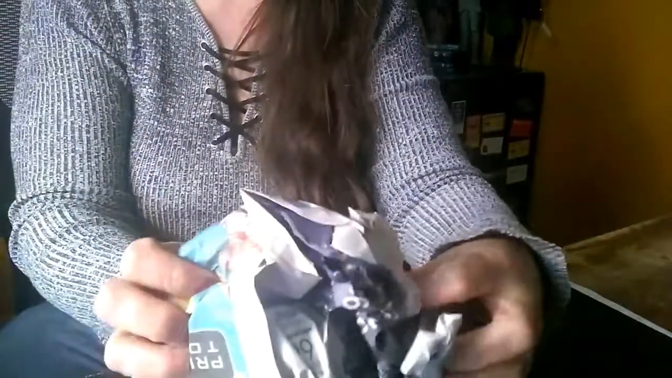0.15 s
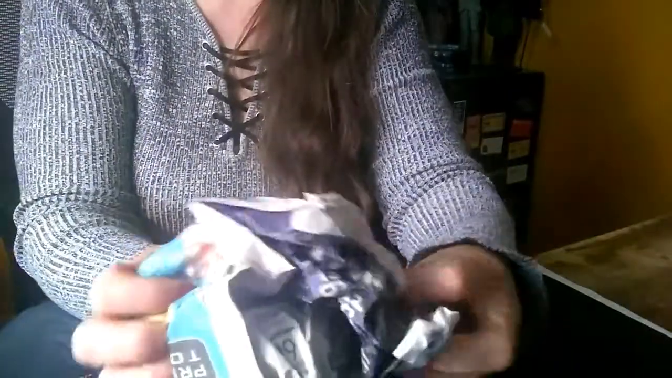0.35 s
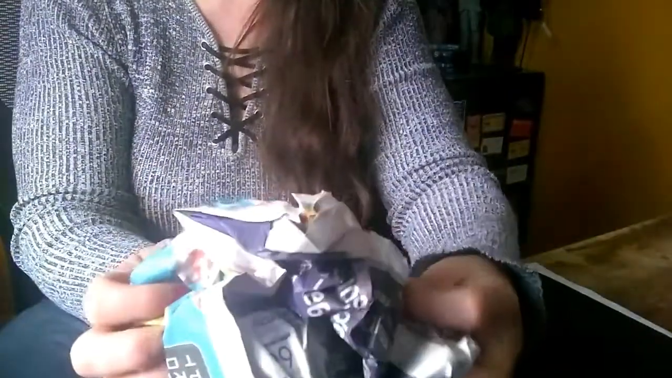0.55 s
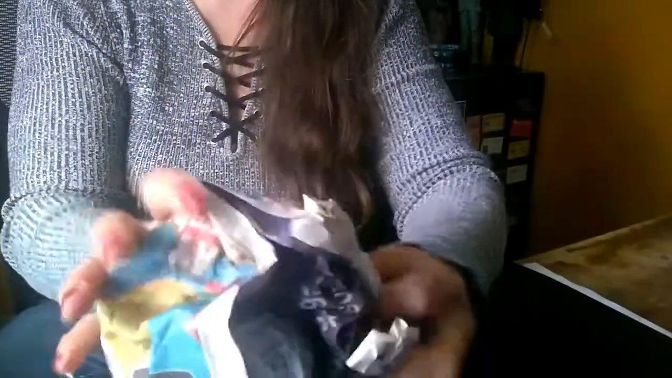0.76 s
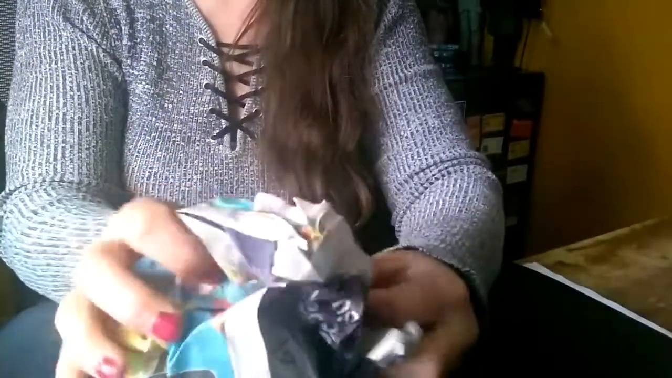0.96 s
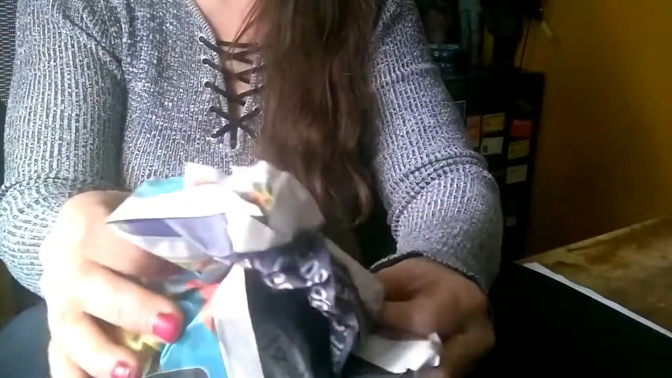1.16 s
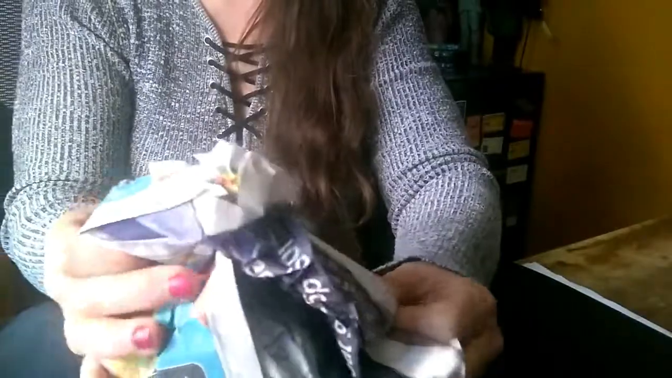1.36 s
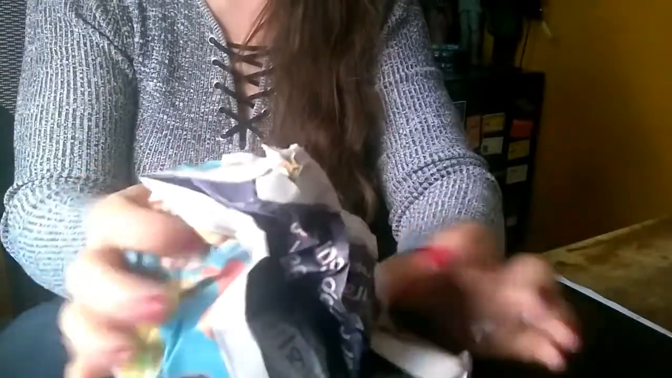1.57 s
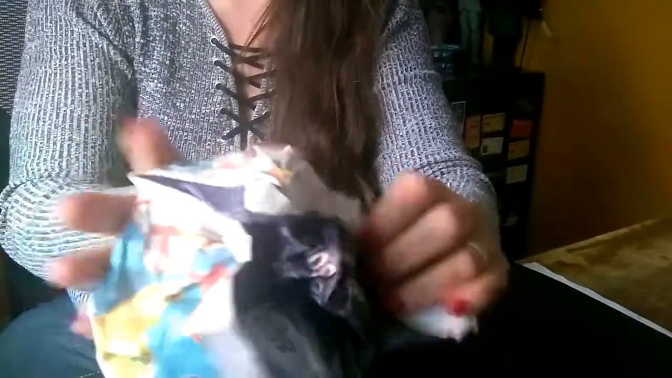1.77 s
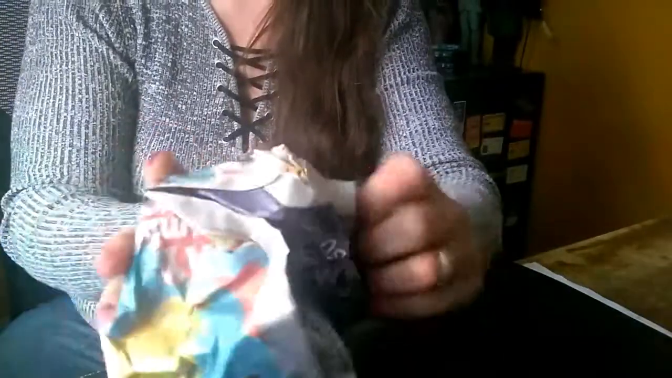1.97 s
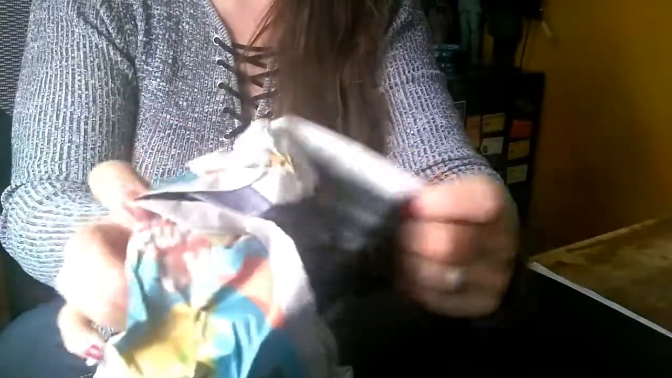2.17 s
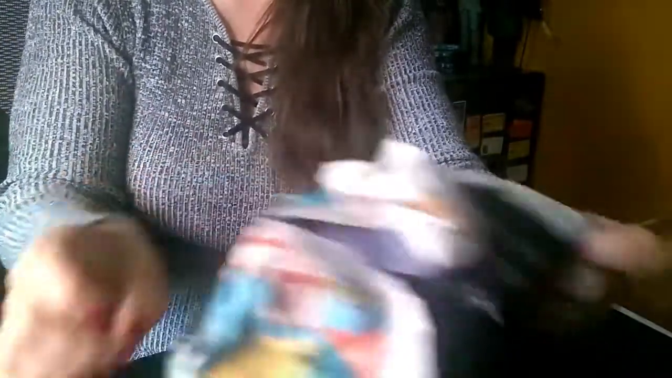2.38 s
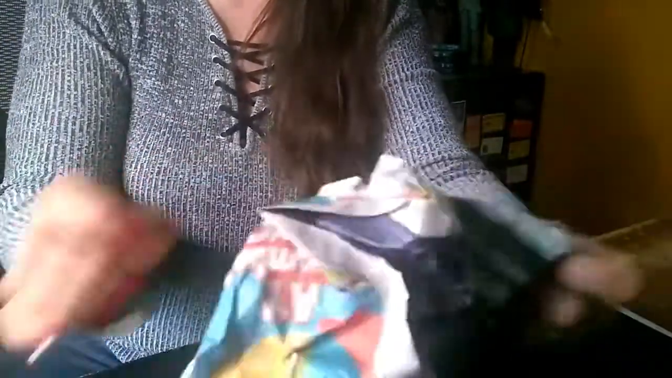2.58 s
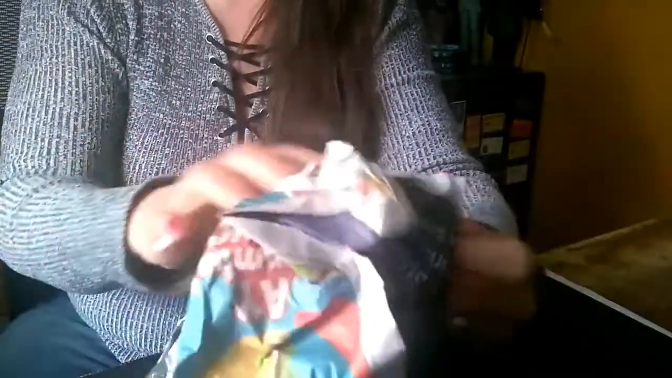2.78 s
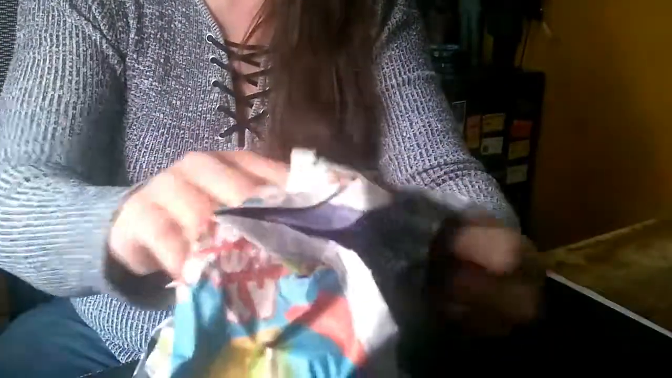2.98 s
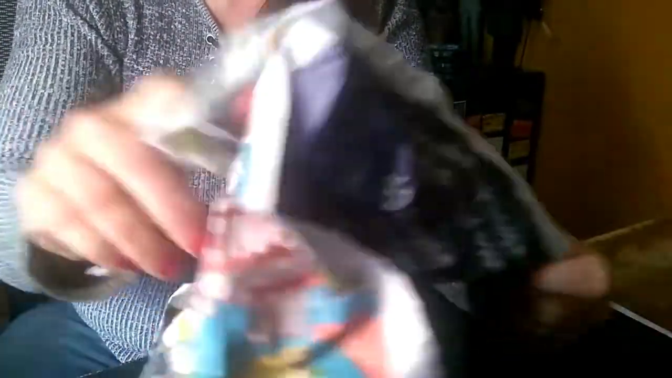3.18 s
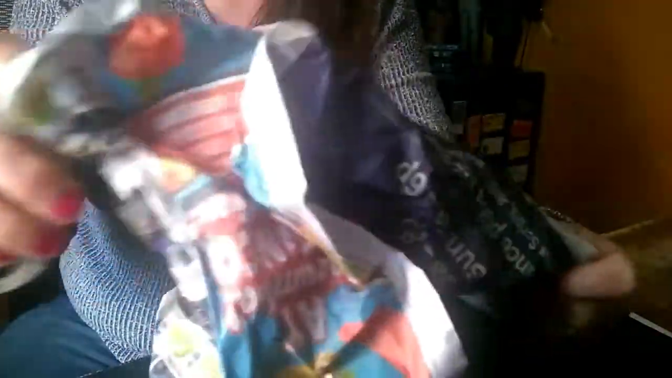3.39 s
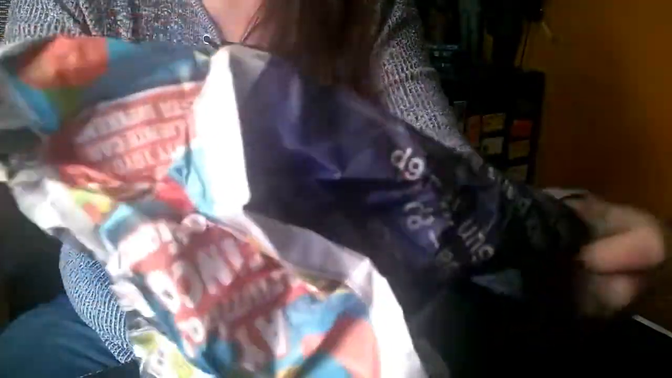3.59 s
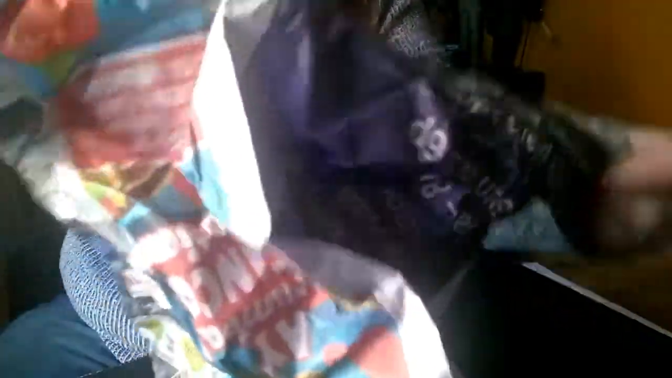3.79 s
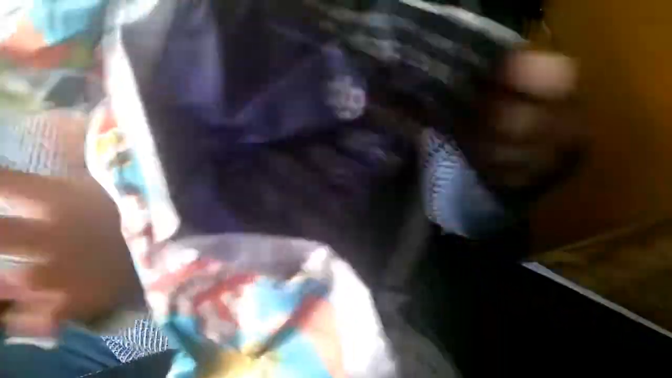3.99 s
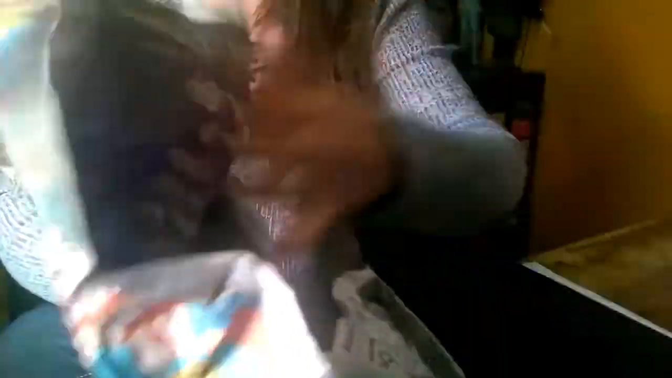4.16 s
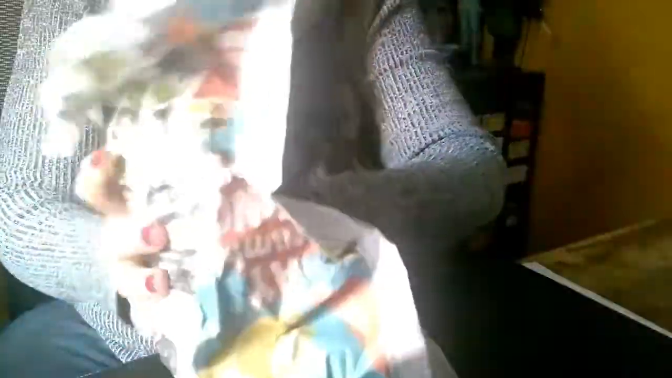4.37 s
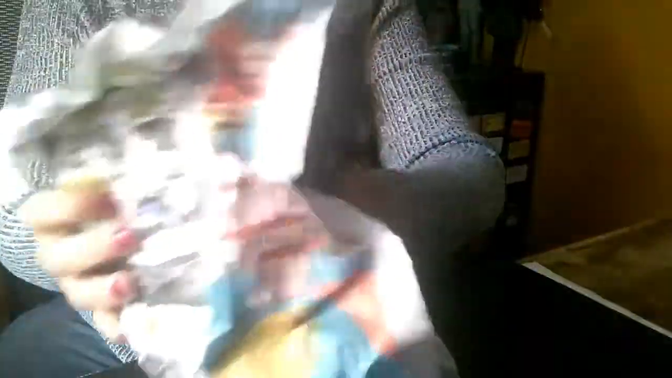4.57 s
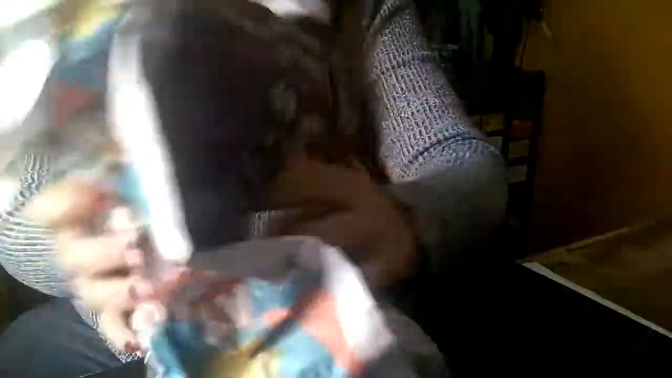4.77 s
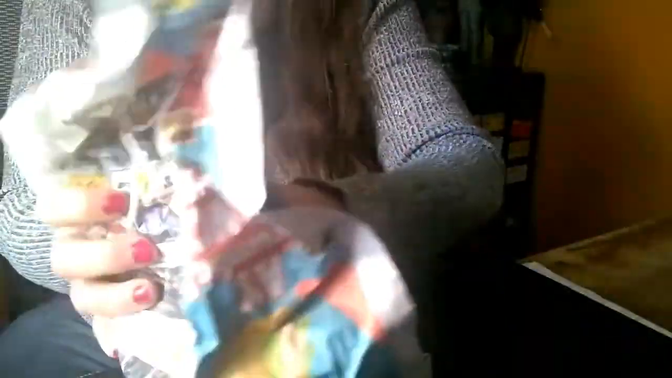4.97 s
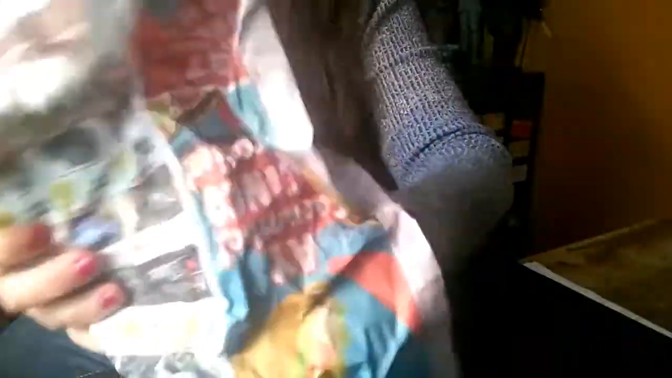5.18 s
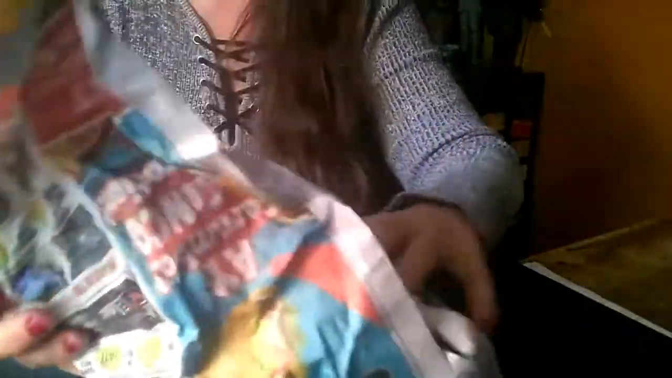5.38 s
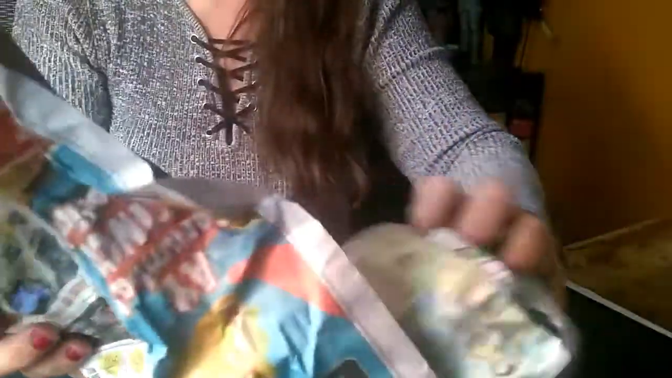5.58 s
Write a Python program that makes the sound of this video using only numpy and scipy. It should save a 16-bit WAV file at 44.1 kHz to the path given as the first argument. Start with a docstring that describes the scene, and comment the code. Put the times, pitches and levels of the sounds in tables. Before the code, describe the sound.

Crumpled newspaper is pulled open close to the microphone, crinkling and snapping in uneven bursts with brief hushes between them.

```python
"""Two hands pull open a ball of crumpled newspaper close to a laptop microphone in a quiet room.
It starts at once: tiny creases and sliding sheets rustle (short jolts and coloured noise), over faint air.
Sharp snaps and duller thumps (jolts that ring paper facets and folds) crowd in up to about 2.4 s.
After a hush a busy burst follows at 3 s, then a near pause at 3.6 s, and a last rush around 5 s that eases.
A short room tail follows the snaps and thumps; a noise gate lowers the pauses and the top is rolled off."""
import sys
import numpy as np
from scipy import signal
from scipy.fft import rfft, irfft
from scipy.io import wavfile
from scipy.ndimage import uniform_filter1d, minimum_filter1d

SR = 44100
rng = np.random.default_rng(int(sys.argv[2]) if len(sys.argv) > 2 else 0)


def wrap_up_sound(samples):
    """Save the sound to the file named by the first command line argument, as 16-bit audio."""
    columns = np.atleast_2d(samples).T
    # keep every value between -1 and 1, then stretch to whole-number steps
    tamed = np.clip(columns, -1, 1)
    steps = np.round(tamed * 32767).astype(np.int16)
    wavfile.write(sys.argv[1], SR, steps)


def convert_level_to_amplitude(level_db):
    """Map a level in decibels to its linear amplitude factor."""
    exponent = np.asarray(level_db, float) / 20
    return 10 ** exponent


N = 248724

# Levels in the tables are settings ahead of the trims, room, table top and microphone.
# creases that snap: (time [s], crack level [dB], facet pitch [Hz], tick level [dB], tick pitch [Hz])
SNAPS = [(0.0034, -24, 2300, -30.5, 4360), (0.0424, -23.5, 2110, -33, 4490), (0.0559, -23, 2060, -25, 4100),
         (0.1901, -15.5, 1880, -22.5, 4530), (0.3087, -24, 3530, -51, 4130),
         (0.379, -15.5, 2600, -20.5, 5600), (0.4205, -18.5, 2540, -45, 5770),
         (0.4381, -27, 2510, -31, 5290), (0.4968, -25.5, 2680, -31.5, 5200), (0.607, -31, 1940, -28, 4660),
         (0.632, -19, 3340, -27.5, 5200), (0.7906, -27, 2080, -43, 6220), (0.8024, -21.5, 2050, -47, 5760),
         (0.8652, -12.5, 2190, -39, 4730), (0.8777, -8, 2770, -27, 5360), (0.8848, -14, 2260, -30, 4290),
         (0.9158, -18, 2270, -31, 4220), (0.9516, -12.5, 1980, -23, 5300), (0.9634, -16.5, 2740, -30, 5000),
         (0.9956, -19, 2310, -27.5, 4240), (1.0416, -29, 2570, -30, 6210), (1.052, -27, 1300, -27, 5630),
         (1.0725, -18.5, 2260, -23, 4180), (1.099, -22, 3550, -24.5, 5900), (1.134, -20.5, 1790, -56, 4310),
         (1.2152, -27, 1900, -36, 6400), (1.2456, -18, 1560, -47, 6980), (1.2585, -16, 2120, -52, 4160),
         (1.281, -17.5, 1890, -32, 5820), (1.315, -11.5, 1570, -42, 4480), (1.4874, -25, 1760, -30, 4550),
         (1.4972, -19, 1960, -18.5, 4270), (1.5076, -23, 3170, -25, 4150), (1.5213, -24, 2100, -20.5, 5030),
         (1.539, -19.5, 2180, -45, 7190), (1.6627, -24.5, 2770, -33, 4590), (1.715, -21, 2720, -37, 5780),
         (1.732, -16, 2480, -29, 4100), (1.854, -29, 2810, -39, 4400), (1.9248, -44, 2650, -24, 5860),
         (1.9626, -40, 3520, -38, 5730), (1.9969, -25, 3630, -19.5, 7100), (2.0088, -17, 2390, -19, 5300),
         (2.039, -22.5, 1930, -26, 6730), (2.0446, -20.5, 1860, -24.5, 5900), (2.1245, -8, 2100, -27, 4240),
         (2.1409, -17, 2560, -18.5, 6800), (2.147, -12, 1640, -40, 5660), (2.1779, -12.5, 1500, -35, 6240),
         (2.194, -18, 3190, -40, 5750), (2.2072, -22, 2020, -27, 4970), (2.2428, -10, 2170, -27, 4870),
         (2.2615, -16, 1760, -24, 4120), (2.2914, -7, 2220, -28, 5090), (2.3141, -18, 2690, -22, 5160),
         (2.33, -18, 2440, -25, 5610), (2.37, -15, 2810, -55, 6170), (2.579, -38, 2530, -46.5, 4300),
         (2.587, -35.5, 3430, -64, 4290), (2.599, -35, 2860, -50, 4180), (2.6817, -41.5, 1300, -41.5, 4190),
         (2.7483, -32, 2230, -36, 4220), (2.8086, -26.5, 2310, -49, 4160), (2.9644, -30, 3640, -20.5, 6250),
         (2.982, -21, 3560, -28, 4230), (3.0008, -19, 2480, -24.5, 4790), (3.024, -21.5, 2220, -31, 4300),
         (3.0384, -10.5, 2060, -38, 6060), (3.059, -15, 2120, -46, 4430), (3.0996, -7.5, 2020, -43, 4870),
         (3.121, -20, 1460, -22, 4480), (3.1529, -24, 1590, -20, 6000), (3.236, -19, 1300, -22.5, 5300),
         (3.251, -16.5, 2560, -15.5, 4930), (3.2809, -15.5, 1660, -33, 6290),
         (3.2874, -23, 1960, -29, 4200), (3.3204, -11.5, 1790, -35, 4100), (3.3514, -23, 3150, -54, 5330),
         (3.3657, -23, 1650, -38, 5200), (3.3864, -23, 2530, -32, 4720), (3.4008, -16.5, 1660, -32, 4640),
         (3.408, -21.5, 1720, -28.5, 6590), (3.4217, -20, 2010, -31, 4590), (3.4405, -15, 1550, -34, 7210),
         (3.4583, -6.5, 2100, -14.5, 5100), (3.4778, -15.5, 1630, -19, 5050),
         (3.5162, -21, 1970, -19.5, 5340), (3.5513, -17, 2640, -18.5, 4700), (3.56, -42, 3210, -23.5, 5760),
         (3.6736, -36, 1460, -70, 4160), (3.706, -29.5, 1310, -62, 4100), (3.7743, -34, 1880, -38, 4470),
         (3.8179, -28, 1390, -49, 4750), (3.8594, -32, 1700, -31, 7410), (4.0467, -25.5, 1790, -35, 4760),
         (4.123, -17.5, 2800, -49, 5010), (4.135, -22, 1790, -45, 5270), (4.1589, -17, 2660, -29, 5030),
         (4.1792, -14.5, 1690, -18, 5500), (4.2004, -36, 2000, -32, 5330), (4.2637, -21, 1590, -36, 4670),
         (4.2752, -19, 1870, -16.5, 5700), (4.283, -12, 1710, -21.5, 4760), (4.371, -25, 1420, -32.5, 4460),
         (4.3915, -21, 1920, -47, 5780), (4.4044, -26, 2300, -40, 5880), (4.4333, -26, 1740, -33, 7020),
         (4.4793, -17.5, 2860, -30, 6340), (4.538, -30, 1420, -42, 5360), (4.584, -23, 1250, -54, 5850),
         (4.6033, -17, 1310, -55, 4220), (4.6643, -17, 1450, -32, 4520), (4.7194, -18.5, 1230, -45, 5590),
         (4.7295, -18, 1860, -46, 4530), (4.8382, -18.5, 1700, -33, 5610), (4.8601, -17, 2100, -15, 7300),
         (4.8964, -10.5, 3130, -21, 6940), (4.914, -19, 1680, -24, 5500), (4.9234, -21, 1400, -24, 5770),
         (4.9724, -21, 3230, -32, 4410), (4.996, -13.5, 1810, -41, 4500), (5.0015, -22, 3070, -16.5, 5700),
         (5.0144, -20, 2460, -20.5, 6620), (5.021, -11.5, 2530, -38, 5250), (5.043, -19, 2330, -30, 5250),
         (5.069, -18, 1540, -30, 5760), (5.0975, -11, 1460, -46, 5850), (5.1146, -19, 2860, -26, 5820),
         (5.1502, -20, 1730, -29, 5620), (5.1593, -15.5, 1670, -15.5, 6030), (5.1954, -22, 1720, -40, 4330),
         (5.2246, -23, 2620, -37, 5710), (5.232, -19.5, 1600, -32, 6000), (5.3104, -25, 1420, -26.5, 4500),
         (5.434, -18.5, 1710, -32, 6040), (5.518, -20, 1710, -51, 4950)]
# larger folds that give way: (time [s], thump level [dB], fold pitch [Hz], ring width [share of pitch])
THUMPS = [(0.011, -37, 730, 0.34), (0.047, -27, 525, 0.19), (0.067, -27, 593, 0.25),
          (0.187, -34, 860, 0.25), (0.31, -35, 670, 0.25), (0.345, -32, 543, 0.25), (0.375, -18, 563, 0.27),
          (0.411, -24, 655, 0.38), (0.436, -28, 465, 0.25), (0.494, -32, 790, 0.16),
          (0.593, -33, 533, 0.32), (0.631, -24, 480, 0.23), (0.656, -25, 570, 0.21),
          (0.818, -33.5, 332, 0.27), (0.882, -26.5, 638, 0.29), (0.909, -18.5, 644, 0.18),
          (0.95, -19.5, 570, 0.23), (0.993, -22, 734, 0.22), (1.05, -28, 890, 0.25),
          (1.112, -28, 620, 0.27), (1.214, -18.5, 760, 0.37), (1.313, -19, 575, 0.3),
          (1.415, -26.5, 654, 0.25), (1.498, -30, 467, 0.25), (1.537, -26.5, 776, 0.17),
          (1.652, -30.5, 625, 0.23), (2.043, -27, 590, 0.22), (2.063, -30, 614, 0.23),
          (2.126, -16, 550, 0.29), (2.159, -21, 510, 0.28), (2.243, -13, 563, 0.29),
          (2.328, -18.5, 570, 0.29), (2.573, -48, 536, 0.32), (2.596, -39.5, 550, 0.19),
          (2.681, -47.5, 356, 0.25), (2.963, -39, 568, 0.19), (3.07, -22.5, 544, 0.21),
          (3.098, -18.5, 810, 0.38), (3.25, -19, 600, 0.7), (3.401, -26.5, 370, 0.22),
          (3.46, -19, 365, 0.32), (3.522, -25, 820, 0.25), (3.643, -44.5, 200, 0.23),
          (3.668, -35.5, 580, 0.12), (3.701, -41, 603, 0.19), (3.753, -41.5, 610, 0.25),
          (3.813, -30.5, 299, 0.17), (3.968, -34, 266, 0.19), (4.178, -23, 820, 0.093),
          (4.263, -26, 338, 0.14), (4.532, -29.5, 570, 0.25), (4.549, -27, 820, 0.17),
          (4.602, -29.5, 740, 0.25), (4.666, -25, 350, 0.28), (4.717, -27.5, 565, 0.31),
          (4.782, -40, 608, 0.25), (4.836, -31, 334, 0.19), (4.889, -20.5, 646, 0.21),
          (5.013, -21, 600, 0.23), (5.067, -30, 557, 0.22), (5.195, -23, 825, 0.35),
          (5.229, -26, 870, 0.23), (5.335, -30, 902, 0.18), (5.441, -28, 870, 0.22),
          (5.517, -20, 547, 0.083), (0.946, -22, 340, 0.48), (1.312, -24, 342, 0.6), (1.5, -34, 420, 0.4),
          (2.279, -18, 300, 0.37), (2.327, -24, 331, 0.49), (3.156, -29, 331, 0.4), (4.149, -29, 343, 0.35),
          (4.491, -31, 343, 0.31), (5.114, -26, 266, 0.46), (5.52, -31.5, 313, 0.47)]
# how hard the hands work the paper: (time [s], rustle level [dB])
HANDLING = [(0, -33), (.06, -34), (.17, -43), (.21, -32.5), (.36, -41.5), (.43, -34), (.525, -56.5),
            (.545, -57), (.58, -54), (.624, -37), (.785, -40.5), (.85, -39.5), (.95, -32), (1.05, -37.5),
            (1.126, -37), (1.19, -47.5), (1.28, -35), (1.44, -49), (1.5, -33.5), (1.63, -45.5), (1.74, -42),
            (1.79, -50.5), (1.84, -40), (2.0, -39), (2.09, -37), (2.16, -31.5), (2.33, -30), (2.435, -54.5),
            (2.455, -58), (2.56, -66.5), (2.59, -54.5), (2.62, -56), (2.725, -57), (2.757, -38.5),
            (2.8, -54.5), (2.874, -39.5), (2.944, -46.5), (3.1, -27.5), (3.38, -38), (3.5, -29.5),
            (3.6, -51.5), (3.63, -61), (3.69, -66), (3.712, -45), (3.734, -57.5), (3.815, -39), (3.87, -53),
            (3.9, -65.5), (3.96, -57), (3.99, -49.5), (4.005, -63.5), (4.055, -35.5), (4.12, -40),
            (4.17, -31.5), (4.24, -40), (4.31, -37), (4.57, -41.5), (4.72, -35.5), (4.76, -53),
            (4.81, -47.5), (4.85, -30), (4.9, -26.5), (4.97, -33), (5.17, -35.5), (5.28, -39.5),
            (5.44, -37.5), (5.5, -40), (5.53, -34.5), (5.64, -38.5)]
# colour of the rustle: (time [s], facet pitch [Hz], body [dB], treble [dB], flapping air [dB]),
# the last three relative to the handling level
COLOUR = [(0, 2100, -3, -1.5, -18), (0.199, 2000, -16, -6.5, -33), (.43, 2000, -1, -4, -6),
          (.7, 2150, -6, 1.5, -34), (1.2, 2000, -5, -4, -32), (1.6, 2300, -5, 2.5, -28),
          (1.85, 2600, -6, 4, -22), (2.1, 2200, -5, 3, -44), (2.35, 2100, -0.5, -21, -17.5),
          (2.699, 2400, -3.5, 0, -18), (2.93, 2500, -11.5, 2, -24), (3.05, 2100, -7, -1, -22),
          (3.3, 1800, -1.5, 1.5, -12), (3.57, 2110, -10, -1, -3.5), (3.66, 1420, -11, -18, 9),
          (3.72, 1450, -8, -4.5, -1.5), (3.85, 1600, 2, 2.5, -14), (3.97, 2200, -8, 2.5, -2.5),
          (4.06, 2060, -10, -1, -10), (4.26, 1900, -5, 1, -4), (4.34, 1900, -8, 0.5, -20),
          (4.5, 2100, -9, 4.5, -18), (4.7, 1650, -5, -4, -0.5), (5, 2150, -4, 2.5, -11.5),
          (5.2, 1930, -5.5, 0.5, -9.5), (5.46, 1500, -10.5, -4, -11.5), (5.53, 1440, 0, -5.5, -25),
          (5.64, 1330, 4.5, -15, -30)]
# level of the highest sounds relative to the treble: (time [s], level [dB])
TOP_LEVEL = [(0, -2), (.6, 1), (1.0, 3), (1.1, 7), (1.3, -1), (1.5, 3), (1.8, 0.5), (2.5, 1), (3.2, 0),
             (4, -1), (4.9, 1), (5.64, 4)]
# parts of a crease sound: (slip time [s], ring width [share of pitch], broad share [ratio],
# band low [Hz], band high [Hz], trim [dB]); the spark is the highest part of a snap
CRACK = (-0.56, 0.56, 0.34, 1000.5, 3261.5, -6.5)
THUMP = (0.04, 0.8, 0.18, 168, 1161.5, -4)
TICK = (.0004, 0.88, 0.94, 1900, 8400, 0.89)
SPARK = (.0002, 0.7, 0, 9000, 15999, -7)
# rustle resonances, in rows for body, treble, flapping air and sheen:
# (centre [Hz], ring width [share of pitch], band low [Hz], band high [Hz])
RUSTLE_BANDS = [(560., 1.3, 590, 1400), (5470, 0.49, 4500, 6200), (202, 0.96, 40, 390),
                (12500., 2.1, 8100, 14000)]
# low resonances of table top and microphone housing: (centre [Hz], width [Hz], level [dB])
TABLE_RINGS = [(243.4, 34, -5), (330.7, 38, -2.5), (596, 55, -3.5), (809, 19, -4)]
# tone of the microphone chain: (frequency [Hz], gain [dB])
MIC_TONE = [(30, -14), (100, -5.5), (250, -3.5), (500, -2), (6000, -2.5), (7500, -3.5), (8500, -10.5),
            (9250, -29.5), (10000, -29), (15200, -29.5), (15700, -55), (17000, -81.5)]
# narrow dips in the microphone chain: (centre [Hz], width [Hz], depth [dB])
MIC_DIPS = [(3984, 56, -18.5), (7940, 80, -9.5)]

# facets that ring in the middle of the rustle
FACETS_HZ, FACET_WIDTH = [1020, 1440, 1900., 2500., 3600], 0.45
# crowd of small creases after a large one: level against it, then rise and decay times
CROWD_MIDDLE_DB, CROWD_BODY_DB, CROWD_TREBLE_DB, CROWD_FLAP_DB = -19, -17, -13, -24.5
BUILD_S, SETTLE_S = .001, 0.013
# handling above the usual level makes crowds louder and slips longer (dB per dB)
USUAL_DB, CROWD_GRIP, SLIP_GRIP = -38, .4, .6
SLIP_S, SLIP_SPREAD = .0004, .3  # spread in log time
LATE_S, FOLD_LATE_S = 0.000989, 0.002995  # from the first give to the slip
# a fold's slip time in turns of its pitch, its reach as a ratio of pitch, steady push over rough push
FOLD_TURNS, FOLD_REACH, FOLD_PUSH = 0.65, 2.8, 0.2
SHEEN_DB, SHEEN_SWELL = -7, 0.73
AIR_DB = -74
GATE_OPEN_DB, GATE_DEPTH_DB, GATE_KNEE_DB, GATE_HOLD_S = -52, -14, .8, .008
HISS_DB, HISS_KNEE_HZ = -92, 400.
SPAN = 1024  # samples in one crease sound
SPAN_HZ = np.fft.rfftfreq(SPAN, 1 / SR)[1:]
FULL_HZ = np.fft.rfftfreq(N, 1 / SR) + 1  # shifted by 1 Hz to avoid dividing by zero


def unit(x):
    """Scales a sound to an rms (average strength) of 1."""
    return x / np.sqrt(np.mean(x ** 2))


def at(time_s, curve):
    """Reads a (time, level) curve at the given times."""
    return np.interp(time_s, *np.transpose(curve))


def ring(hz, centre_hz, width):
    """Response of a damped resonance, with gain 1 at its centre."""
    return 1 / (1 + 1j * (hz / centre_hz - centre_hz / hz) / width)


def band(hz, low_hz, high_hz):
    """Passes a range of pitches, with two poles at each edge."""
    return 1 / ((1 + low_hz / (1j * hz)) * (1 + 1j * hz / high_hz)) ** 2


def walk(rate):
    """Random levels, `rate` new ones a second, joined by slopes; spread 1."""
    hold = int(SR / rate)
    steps = np.repeat(rng.standard_normal(N // hold + 1), hold)
    return unit(uniform_filter1d(steps, hold)[:N])


def hiss(response, waver_db):
    """Noise of a given colour whose level wavers."""
    noise = irfft(rfft(rng.standard_normal(N)) * response(FULL_HZ), N)
    return unit(noise * convert_level_to_amplitude(waver_db))


def bursts(time_s, db, pitch_hz, part, roughness, order=2):
    """Each slipping crease is a rough jolt that rings a facet, plus a broad share of the band."""
    slip_s, width, broad, low_hz, high_hz, trim_db = part
    # a negative slip time makes a growing jolt that starts after its listed time
    t = np.arange(SPAN) / SR / np.reshape(slip_s, (-1, 1))
    jolt = rfft(roughness * t * np.exp(-t), axis=1)
    facet = ring(SPAN_HZ, pitch_hz[:, None], width) ** order + broad
    jolt[:, 1:] *= facet * band(SPAN_HZ, low_hz, high_hz)
    jolt[:, 0] = 0
    wave = irfft(jolt, axis=1)
    # the level sets the energy, as an rms over 3 ms
    gain = convert_level_to_amplitude(db + trim_db) * np.sqrt(.003 * SR / np.sum(wave ** 2, axis=1))
    wave *= gain[:, None]
    start = np.clip((time_s - slip_s) * SR, 0, N).astype(int)
    out = np.zeros(N + SPAN)
    np.add.at(out, start[:, None] + np.arange(SPAN), wave)
    return out[:N]


def effort(time_s):
    """Handling level above the usual, in dB."""
    return at(time_s, HANDLING) - USUAL_DB


def crowded(base_db, time_s, db):
    """Raises a level by the crowd of small creases around each large one, dying away after it."""
    power = np.zeros(N)
    place = np.clip(time_s * SR, 0, N - 1).astype(int)
    np.add.at(power, place, convert_level_to_amplitude(2 * (db + CROWD_GRIP * effort(time_s))))
    t = np.arange(-8192, 8193) / SR
    swell = np.exp(np.minimum(t / BUILD_S, -t / SETTLE_S))
    power = signal.fftconvolve(power, swell, "same")
    return 10 * np.log10(convert_level_to_amplitude(2 * base_db) + np.abs(power))


def rustle(count=3400, scatter_db=3.0, most_db=9.0, flutter_db=3.0):
    """Tiny creases at chance moments and the hiss of sliding sheets, both following the handling."""
    t = np.arange(N) / SR
    level_db = at(t, HANDLING)
    colour_s, *columns = np.transpose(COLOUR)
    facet_hz, body_db, treble_db, flap_db = (np.interp(t, colour_s, column) for column in columns)

    snap_s, crack_db, _, tick_db, _ = np.transpose(SNAPS)
    thump_s, thump_db, _, _ = np.transpose(THUMPS)
    snap_s, thump_s = snap_s + LATE_S, thump_s + FOLD_LATE_S
    middle_db = crowded(level_db, snap_s, crack_db + CROWD_MIDDLE_DB)
    body_db = crowded(level_db + body_db, thump_s, thump_db + CROWD_BODY_DB)
    flap_db = crowded(level_db + flap_db, thump_s, thump_db + CROWD_FLAP_DB)
    treble_db = crowded(level_db + treble_db, snap_s, tick_db + CROWD_TREBLE_DB)

    when = rng.uniform(0, N / SR, count)
    size_db = scatter_db * rng.exponential(1, count)
    crinkle_db, slide_db, focus = -1.8, -5.5, .42
    flutter = walk(60)

    def creases(centre_hz, part):
        """Small jolts from shared chance times and sizes, each varied in slip time, pitch and level."""
        slip_s = part[0] * np.exp(.4 * rng.standard_normal(count))
        pitch_hz = centre_hz * np.exp(0.33 * rng.standard_normal(count))
        db = np.minimum(size_db + 2.23 * rng.standard_normal(count), most_db)
        roughness = rng.standard_normal((count, SPAN))
        return convert_level_to_amplitude(crinkle_db) * unit(bursts(when, db, pitch_hz, (slip_s, *part[1:]), roughness))

    def sliding(response):
        """Hiss with a shared flutter and a waver of its own."""
        return hiss(response, flutter_db * (flutter + walk(45)))

    body, treble, flap, sheen = (
        convert_level_to_amplitude(slide_db) * sliding(lambda hz: (ring(hz, centre_hz, width) + 0.079) * band(hz, *edges))
        for centre_hz, width, *edges in RUSTLE_BANDS)
    # facets near the size being worked ring most
    facets = [sliding(lambda hz: ring(hz, f, FACET_WIDTH) ** 2) for f in FACETS_HZ]
    shares = np.abs([ring(f, facet_hz, focus) for f in FACETS_HZ])
    middle = np.sum(shares * facets, axis=0) / np.sqrt(np.sum(shares ** 2, axis=0))
    middle *= convert_level_to_amplitude(slide_db)

    middle += creases(facet_hz[(when * SR).astype(int)], CRACK)
    body += creases(RUSTLE_BANDS[0][0], THUMP)
    treble += creases(RUSTLE_BANDS[1][0], TICK)
    # the highest hiss, above about 8 kHz, swells less than the treble
    sheen *= convert_level_to_amplitude(SHEEN_DB + SHEEN_SWELL * treble_db + at(t, TOP_LEVEL))
    out = sheen + convert_level_to_amplitude(middle_db) * middle + convert_level_to_amplitude(flap_db) * flap
    return out + convert_level_to_amplitude(body_db) * body + convert_level_to_amplitude(treble_db) * treble


def room_air():
    """The steady air of the room: soft noise of even level."""
    return convert_level_to_amplitude(AIR_DB) * hiss(lambda hz: band(hz, 150., 5000.), 0)


def snaps():
    """Each crease that stands out is heard as a crack, a higher tick and a still higher spark."""
    time_s, crack_db, facet_hz, tick_db, tick_hz = np.transpose(SNAPS)
    rough = rng.standard_normal((len(time_s), 2, SPAN + 1))
    # harder handling makes the slip longer
    slip_s = SLIP_S * convert_level_to_amplitude(SLIP_GRIP * np.maximum(effort(time_s), 0))
    slip_s = slip_s * np.exp(SLIP_SPREAD * rough[:, 0, -1])
    slip_at = time_s + LATE_S + slip_s
    crack = bursts(slip_at, crack_db, facet_hz, (slip_s, *CRACK[1:]), rough[:, 0, :-1])
    tick = bursts(slip_at, tick_db, tick_hz, (.8 * slip_s, *TICK[1:]), rough[:, 1, :-1])
    spark_db = tick_db + at(time_s, TOP_LEVEL)
    spark_hz = np.full(len(time_s), RUSTLE_BANDS[3][0])
    return crack + tick + bursts(slip_at, spark_db, spark_hz, SPARK, rough[:, 1, 1:])


def thumps():
    """Larger folds give way slowly, as one push with a rough edge, and sound mostly near their pitch."""
    time_s, thump_db, fold_hz, width = np.transpose(THUMPS)
    slip_s = FOLD_TURNS / fold_hz
    width = np.clip(width, .06, 1.5)[:, None]
    low_hz, high_hz = fold_hz[:, None] / FOLD_REACH, FOLD_REACH * fold_hz[:, None]
    part = (slip_s, width, THUMP[2], low_hz, high_hz, THUMP[5])
    push = FOLD_PUSH + rng.standard_normal((len(time_s), SPAN))
    return bursts(time_s + FOLD_LATE_S + slip_s, thump_db, fold_hz, part, push, order=1)


def room(x, t60_s=0.15, wet_db=-18.5, table_s=0.0023):
    """A short diffuse tail off table and walls: noise that fades by 60 dB in t60_s."""
    t = np.arange(int(.3 * SR)) / SR
    tail = rng.standard_normal(len(t)) * convert_level_to_amplitude(-60 * t / t60_s) * (t > table_s)
    tail /= np.sqrt(np.sum(tail ** 2))
    return x + convert_level_to_amplitude(wet_db) * signal.fftconvolve(x, tail)[:N]


def table(x):
    """The table top and the microphone housing lift a few low resonances."""
    lift = sum(convert_level_to_amplitude(db) * ring(FULL_HZ, f, width_hz / f) for f, width_hz, db in TABLE_RINGS)
    return irfft(rfft(x) * (1 + lift), N)


def scene():
    """Rustle and room air with the echoing snaps and thumps, all coloured by the table."""
    paper = rustle()
    air = room_air()
    return table(paper + air + room(snaps() + thumps()))[None]


def microphone(x):
    """The microphone chain shapes the tone: it rolls off the top and has two narrow dips."""
    mic_hz, mic_db = np.transpose(MIC_TONE)
    db = np.interp(np.log(FULL_HZ), np.log(mic_hz), mic_db)
    for dip_hz, width_hz, dip_db in MIC_DIPS:
        db = db + dip_db * np.exp(-((FULL_HZ - dip_hz) / width_hz) ** 2)
    return irfft(rfft(x) * convert_level_to_amplitude(db), N)


def gate(x, slew_s=0.0021):
    """The gain drops while the short-term level stays under the threshold; it looks a little ahead."""
    level_db = 10 * np.log10(uniform_filter1d(x ** 2, int(.006 * SR)) + 1e-14)
    # the two minus signs turn the running minimum into a running maximum
    held_db = -minimum_filter1d(-level_db, int(GATE_HOLD_S * SR))
    over = np.clip((held_db - GATE_OPEN_DB) / GATE_KNEE_DB, -30, 30)
    shut = 1 / (1 + np.exp(over))
    return x * convert_level_to_amplitude(GATE_DEPTH_DB * uniform_filter1d(shut, int(slew_s * SR)))


def converter_noise():
    """Faint converter hiss, stronger toward the bass."""
    noise = rfft(rng.standard_normal(N)) * (1 + HISS_KNEE_HZ / np.maximum(FULL_HZ, 40.))
    return convert_level_to_amplitude(HISS_DB) * irfft(noise, N)


def band_limit(x):
    """A steep low-pass at the top of the band."""
    return signal.sosfilt(signal.butter(12, 16620, fs=SR, output="sos"), x)


def record(dry):
    """Microphone tone, then the noise gate, then faint converter noise."""
    mix = gate(microphone(dry)) + converter_noise()
    return band_limit(mix)


dry = scene()
out = record(dry)
wrap_up_sound(out)
```